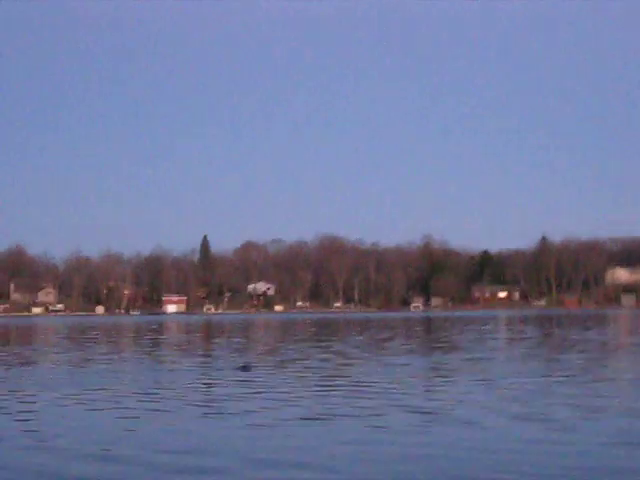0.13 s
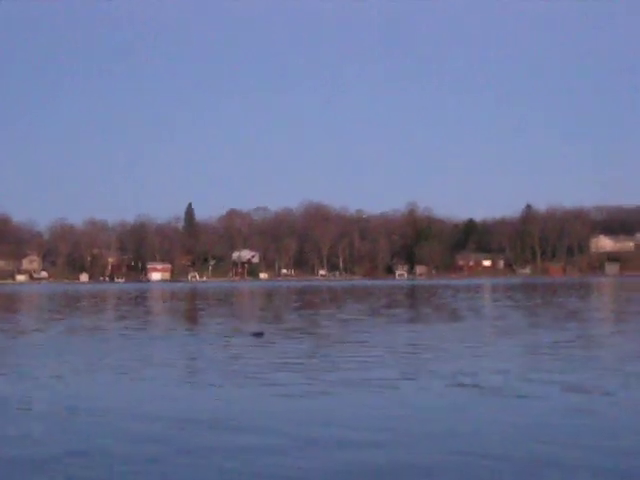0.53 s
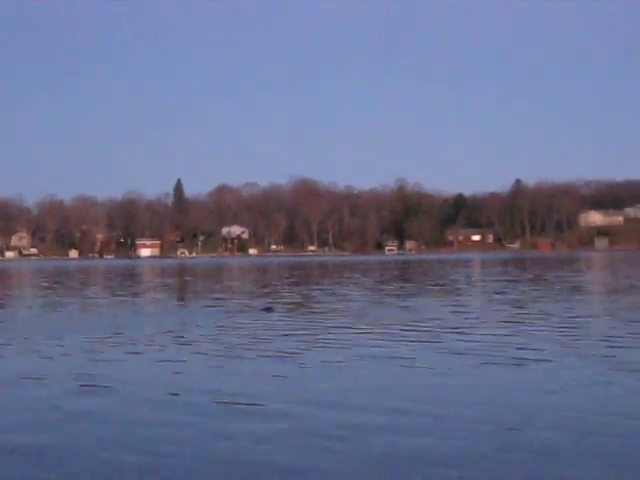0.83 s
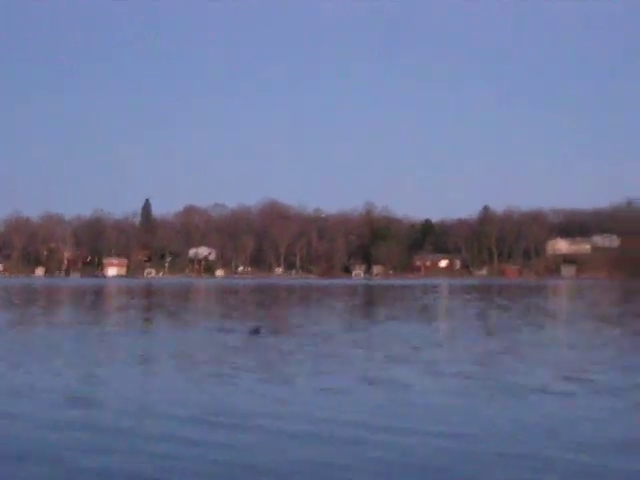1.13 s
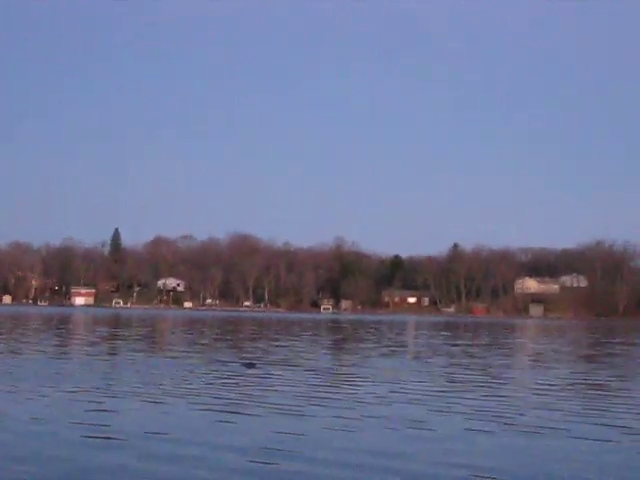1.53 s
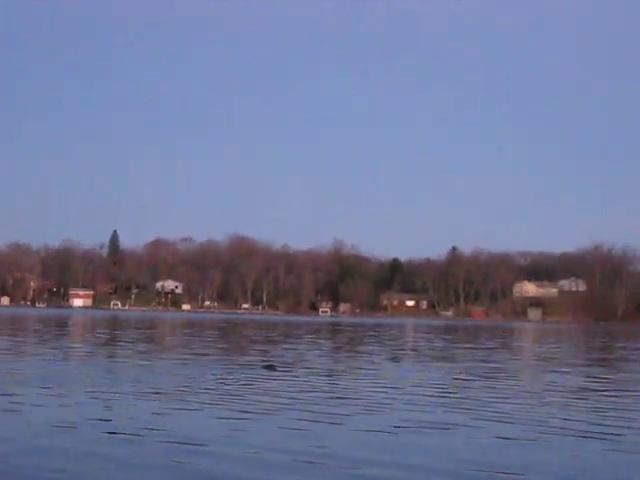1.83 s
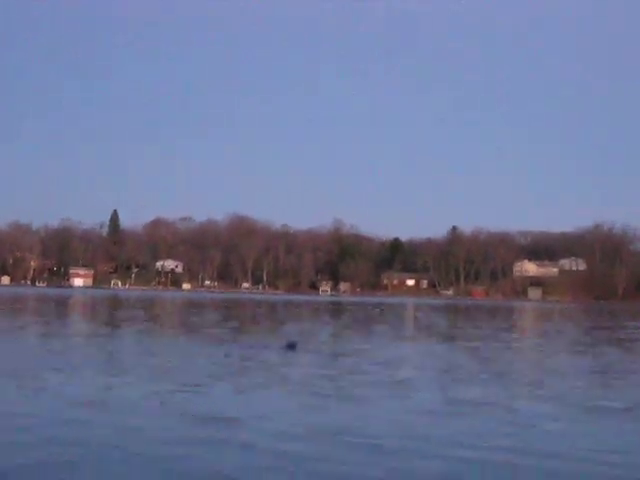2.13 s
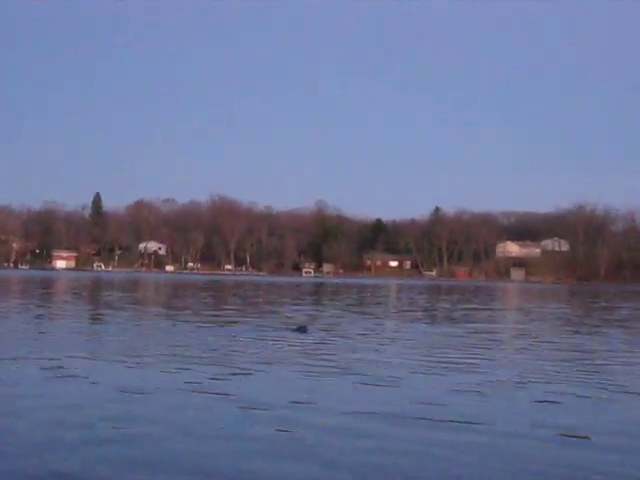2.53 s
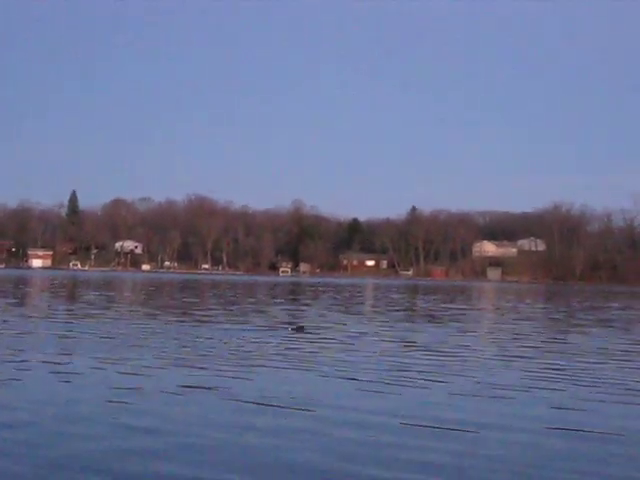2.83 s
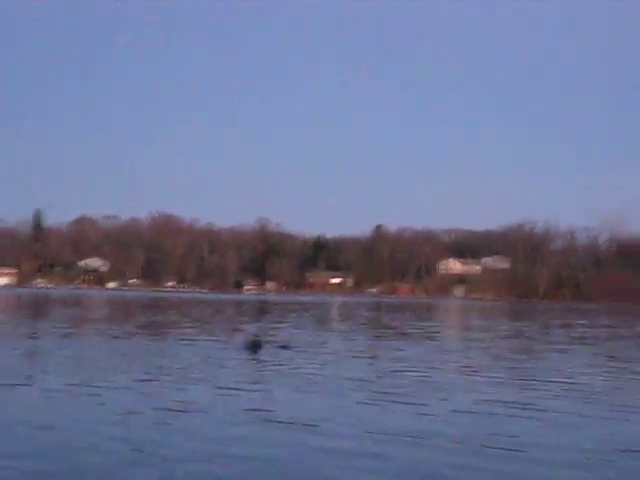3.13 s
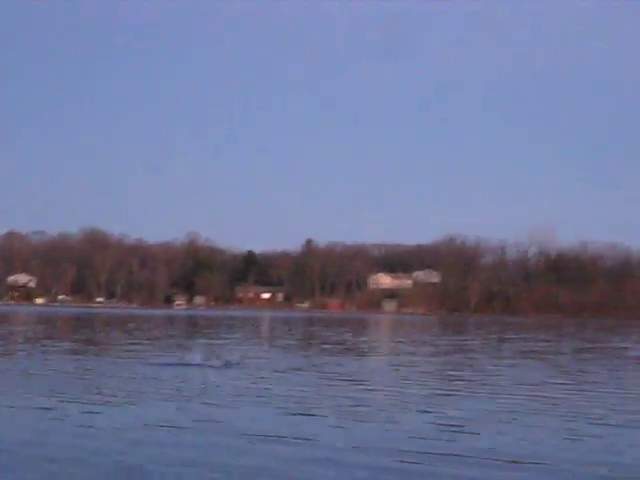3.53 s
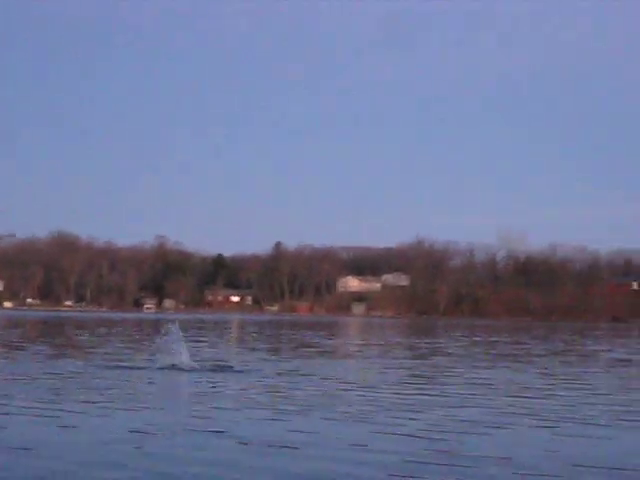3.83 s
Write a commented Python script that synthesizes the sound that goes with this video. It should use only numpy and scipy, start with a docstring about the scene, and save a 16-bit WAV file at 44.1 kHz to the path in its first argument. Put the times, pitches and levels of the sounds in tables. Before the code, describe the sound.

A beaver's tail slaps lake water with a sharp crack after gentle lapping, then spray falls

```python
"""A lake shore at dusk, over a quiet hiss and a faint patter of drops.
Three small clicks, damped modes of a hard body, precede a brief swell of brighter hiss and two lone gurgles.
Then wavelets lap close by: ringing air pockets, noisy splashes, chirping drops and bursting droplets.
A beaver slaps the water with its tail, an impact of short modes and noise; the cavity closes with a thump
and the thrown water rains back as random impacts and bubbles."""
import sys
import numpy as np
from scipy import signal
from scipy.io import wavfile

SR = 44100
rng = np.random.default_rng(int(sys.argv[2]) if len(sys.argv) > 2 else 0)


def master(y):
    """Save y as 16-bit WAV."""
    cut = np.clip(np.atleast_2d(y).T, -1, 1)
    pcm = np.round(cut * 32767)  # scale
    wavfile.write(sys.argv[1], SR, pcm.astype(np.int16))


N = 176400
T = np.arange(N) / SR

# The tail meets the water, edge first, then flat: t/s, level/dB, f/Hz, decay/s
SLAP_MODES = [(3.3308, -16, 5980, 0.0011), (3.3312, -24, 834, 0.0021), (3.3368, -9, 1000, .0012),
              (3.3374, -18.5, 1860, 0.0018), (3.334, -16, 3400, .002), (3.3415, -11, 1960, 0.00065),
              (3.3417, -28, 364, 0.003)]
# The cavity closes: t/s, level/dB, f/Hz, decay/s
CAVITY_MODES = [(3.5638, -18.5, 895, 0.0012), (3.5648, -21.5, 2260, 0.0013), (3.5655, -28, 390, 0.0037),
                (3.5703, -22.5, 603, 0.0024)]
# Spectral density of the torn sheet of water: f/Hz, level/dB (per Hz, relative)
SHEET_SPECTRUM = [(80, -38), (220, -19), (500, -3), (850, -2), (1400, -1), (2000, -6), (2800, -8.5),
                  (3500, 1), (4500, -9.5), (6200, -4.5), (9000, -10.5), (13000, -13.5), (16000, -18)]
SHEET_S, SHEET_DB = 3.3308, -22
SHEET_RISE_S, SHEET_HOLD_S, SHEET_FALL_S = .0025, .0095, .0058


def tail_slap():
    """Impact and cavity collapse: the tail cracks, tears up a sheet of water, and the hole thumps shut."""
    before = np.minimum(T - SHEET_S, 0) / SHEET_RISE_S
    after = np.maximum(T - SHEET_S - SHEET_HOLD_S, 0) / SHEET_FALL_S
    noise = coloured(rng.standard_normal((2, N)), SHEET_SPECTRUM)
    sheet = from_db(SHEET_DB) * np.exp(before - after) * noise
    return sheet + pings(SLAP_MODES, rise=.21) + pings(CAVITY_MODES, rise=.2)


# Thrown water falling back, end values held: t/s, level/dB (before the patter and bubble gains)
SPRAY_LEVEL = [(3.5, -57), (3.58, -40), (3.64, -34.5), (3.71, -41.5), (3.77, -39), (3.84, -42), (3.91, -39),
               (4.0, -41.5)]
# Spectral density of the patter: f/Hz, level/dB (per Hz, relative)
SPRAY_SPECTRUM = [(80, -19), (250, -11), (600, -11), (1200, -1), (2600, -0.5), (4000, -8), (6500, -9),
                  (9000, -17.5), (16000, -18)]
# Loudness of a bubble by its pitch, also for the lapping: f/Hz, level/dB (relative)
BUBBLE_LOUDNESS = [(300, -21), (400, -10.5), (570, -4.5), (1100, 0.5), (1600, 0.5), (3200, 4.5), (4500, -6),
                   (6500, -1)]
BUBBLE_CYCLES = 2.4  # mean decay of a small bubble, in periods


def spray():
    """Shot noise: thousands of random drop impacts patter on the lake, some trapping resonant bubbles."""
    impacts = [grains(6000, spread_db=3.5) for _ in range(2)]
    patter = coloured(impacts, SPRAY_SPECTRUM, patchy_db=3)
    bubbles = swarm(700, BUBBLE_LOUDNESS, BUBBLE_CYCLES, spread_db=4.5, rise=.37, count=4000)
    return level(SPRAY_LEVEL) * (from_db(-1) * patter + from_db(-6) * bubbles)


# Vigour of the lapping: t/s, level/dB (before the bubble and wash gains)
LAPPING_LEVEL = [(1.4, -58), (1.46, -49.5), (1.58, -48), (1.68, -56.5), (1.79, -48.5), (1.93, -54),
                 (2.2, -54), (2.38, -49), (2.68, -45.5), (2.85, -40.5), (3.02, -39.5), (3.27, -41.5),
                 (3.5, -43), (4.0, -48)]
# Spectral density of the wash: f/Hz, level/dB (per Hz, relative)
WASH_SPECTRUM = [(150, -32), (260, -24), (380, -9), (570, -6), (1100, 6.5), (1500, -1), (2400, -3.5),
                 (3300, -3.5), (4500, -13.5), (7000, -16), (15000, -28)]
LAP_START_S, LAP_FADE_S = 1.39, .04  # the first wavelet arrives
BUBBLES_PER_S, BUBBLE_DB, WASH_DB = 1000, -2.5, -8.5


def lapping():
    """Bubble resonance: wavelets trap a swarm of small bubbles over a soft, uneven wash of noise."""
    bubbles = swarm(BUBBLES_PER_S, BUBBLE_LOUDNESS, BUBBLE_CYCLES, spread_db=5.5, rise=.72, count=5000)
    wash = coloured(rng.standard_normal((2, N)), WASH_SPECTRUM, patchy_db=4.5)
    arrival = np.clip((T - LAP_START_S) / LAP_FADE_S, 0, 1)
    return arrival * level(LAPPING_LEVEL) * (from_db(BUBBLE_DB) * bubbles + from_db(WASH_DB) * wash)


# Air pockets that ring: t/s, level/dB (nominal), f/Hz, glide/octaves per length, length/s
AIR_POCKETS = [(.731, -45.5, 530, .05, .017), (.817, -43, 2340, .36, .013),
               (1.456, -35.5, 1700, -.54, .023), (1.474, -30, 1097, -.2, .026),
               (1.521, -39, 653, -.16, .049), (1.560, -33.5, 599, .5, .051), (1.618, -27, 1076, .5, .023),
               (1.629, -32, 1490, 1.15, .023), (1.827, -35.5, 850, .31, .041),
               (1.852, -31.5, 529, .23, .03), (1.944, -39, 908, .1, .02), (1.997, -36.5, 1226, -.72, .027),
               (2.122, -35, 1407, -.1, .018), (2.316, -33, 870, 0, .016), (2.338, -33.5, 894, .03, .018),
               (2.428, -40, 531, .04, .084), (2.568, -29, 866, -.33, .03), (2.598, -31.5, 1150, 0, .018),
               (2.7, -30, 1100, -.09, .027), (2.821, -26.5, 1158, 0, .014), (2.967, -27, 969, .32, .033),
               (3.143, -27.5, 1247, -.45, .052), (3.757, -27, 1182, -.13, .018),
               (3.868, -31, 880, .2, .022), (3.874, -28, 520, .65, .042), (3.876, -40, 265, .1, .045),
               (3.95, -32.5, 1094, .04, .027)]


def gurgles(rough, rise_share):
    """Cavity resonance: each air pocket swells and dies, its pitch gliding as it changes shape."""
    out, t = np.zeros(N), T[:SR // 6]
    noises = rng.standard_normal((len(AIR_POCKETS), 2, len(t)))
    for (s, db, hz, glide, length_s), noise in zip(AIR_POCKETS, noises):
        age = t / (length_s * rise_share)
        envelope = (age * np.exp(1 - age)) ** 2
        pitch = hz * 2 ** (glide * np.minimum(t / length_s, 1.2))
        phase = 2 * np.pi * np.cumsum(pitch) / SR
        # independent noises on sine and cosine roughen amplitude and phase
        a, b = (rms_one(band(n, 27, 170)) for n in noise)
        tone = (1 + rough * a) * np.sin(phase) + rough * b * np.cos(phase)
        add(out, s, from_db(db - 4) * envelope * tone)
    return out


SHED_DB, SHED_OCTAVES = -8, 2.2  # level before the fall with pitch; range above the pocket's pitch
DROP_CYCLES, DROP_GLIDE = 3.8, .06  # decay in periods; octaves per decay time


def shed_bubbles(count):
    """Size and resonance: each air pocket sheds a few smaller, higher and weaker bubbles."""
    out = np.zeros(N)
    all_draws = rng.random((len(AIR_POCKETS), count, 2))
    for (s, db, hz, _, length_s), draws in zip(AIR_POCKETS, all_draws):
        for late, place in draws:
            pitch = hz * 2 ** (SHED_OCTAVES * place)
            gain = from_db(db + SHED_DB) * hz / pitch
            add(out, s + 2 * late * length_s, gain * ping(pitch, DROP_CYCLES / pitch, DROP_GLIDE))
    return out


# Small splashes: t/s, level/dB (nominal), centre f/Hz, decay/s
SPLASH_EVENTS = [(1.46, -35, 2360, .006), (1.773, -31, 2620, .009), (1.924, -32.5, 2170, .002),
                 (2.001, -37.5, 2000, .012), (2.077, -33.5, 3300, .0056), (2.11, -34.5, 3240, .005),
                 (2.3179, -31, 2600, .002), (2.634, -28, 4400, .004), (2.699, -27, 2340, .0098),
                 (2.8443, -20, 1710, .0052), (2.856, -27, 2600, .0099), (3.005, -25, 1810, .012),
                 (3.061, -18, 1410, .002), (3.147, -25.5, 3240, .011), (3.228, -26, 3000, .0076),
                 (3.252, -25, 2020, .008), (3.454, -30.5, 4500, .004), (3.915, -29, 2880, .007)]
SPLASH_BUBBLES_DB, SPLASH_PUFF_DB, SPLASH_OCTAVES = -3.5, -3.5, .494  # gains; spread of pitch


def splashes(count):
    """Wave breaking: a puff of noisy spatter and a quick cluster of bubbles around one pitch."""
    out = np.zeros(N)
    all_draws = rng.standard_normal((len(SPLASH_EVENTS), count, 3))
    for (s, db, hz, decay_s), draws in zip(SPLASH_EVENTS, all_draws):
        for k, (late, place, bend) in enumerate(draws):
            age = 2 * (k + np.tanh(abs(late))) / count
            pitch = hz * 2 ** (SPLASH_OCTAVES * np.clip(place, -2, 2))
            gain = from_db(db + SPLASH_BUBBLES_DB) * np.exp(-age) * np.sign(bend)
            bubble = ping(pitch, BUBBLE_CYCLES / pitch, BUBBLE_GLIDE * bend, rise=.59)
            add(out, s + age * decay_s, gain * bubble)
    puffs = bursts(SPLASH_EVENTS, width=.54, attack_s=.00034)
    return out + from_db(SPLASH_PUFF_DB) * band(puffs, 300, 6200)


# Single drops falling close by: t/s, level/dB (before the mix gain), f/Hz
DROP_EVENTS = [(1.434, -34, 2500), (1.512, -34, 1750), (1.583, -32.5, 2550), (1.686, -38, 2000),
               (1.763, -30, 1900), (1.787, -34, 1800), (1.839, -37, 2550), (2.115, -30, 1450),
               (2.359, -32, 3000), (2.4452, -27, 3400), (2.529, -31.5, 1950), (2.7306, -27, 1920),
               (2.7842, -28, 2070), (2.7947, -23, 2900), (2.809, -27, 2420), (2.8581, -23, 2800),
               (2.8899, -28, 1690), (2.9552, -26, 1920), (3.0618, -14, 3330), (3.1496, -22, 3230),
               (3.1587, -22, 3270), (3.2292, -23, 1440), (3.2803, -25, 2150), (3.379, -27, 1870),
               (3.393, -25.5, 2100)]
DROP_TICK_DB, DROP_TICK_S = -7, .0004  # tick of contact: relative level, decay


def drops():
    """Impact and entrainment: a drop ticks on contact and traps a bubble that chirps upward."""
    out = np.zeros(N)
    draws = rng.uniform(.5, 1.5, (len(DROP_EVENTS), 2))
    for (s, db, hz), (life, bend) in zip(DROP_EVENTS, draws):
        add(out, s, from_db(db) * ping(hz, life * DROP_CYCLES / hz, bend * DROP_GLIDE, rise=.07))
    contacts = [(s, db + DROP_TICK_DB, 2 * hz, DROP_TICK_S) for s, db, hz in DROP_EVENTS]
    return out + bursts(contacts, width=1, attack_s=DROP_TICK_S / 10)


# Level of the fine droplet crackle, before its flurries: t/s, level/dB
CRACKLE_LEVEL = [(1.35, -80), (1.46, -58), (1.56, -57), (1.62, -63), (1.76, -60), (1.95, -65),
                 (2.07, -51.5), (2.17, -63), (2.4, -52.5), (2.6, -57), (2.95, -50), (3.25, -49), (3.5, -56),
                 (4.0, -70)]
# Loudness of a fine droplet by its pitch: f/Hz, level/dB (relative)
CRACKLE_LOUDNESS = [(4500, 0), (15500, 0)]
# Droplets bursting close by: t/s, level/dB, f/Hz
NEAR_TICKS = [(1.6555, -17.5, 11600), (2.17, -33, 12700), (2.233, -31, 4860), (2.258, -31.5, 5500),
              (2.2855, -23, 13000), (2.3187, -28, 4770), (2.3403, -25, 12400), (2.3893, -27, 5320),
              (2.3947, -23, 12000), (2.4453, -19.5, 11000), (2.513, -30, 10400), (2.6113, -29, 14000),
              (2.6525, -14, 6070), (2.6524, -15.5, 12700), (2.6803, -29, 5750), (2.8731, -20.5, 13000),
              (2.9134, -28, 14000), (2.9556, -25, 12400), (2.9846, -26, 10200), (3.0964, -22.5, 5600),
              (3.1611, -23, 12200), (3.2192, -22, 6500), (3.23, -20.5, 6040), (3.4306, -22.5, 9200),
              (3.478, -26, 12000)]
CRACKLES_PER_S, CRACKLE_CYCLES, FIZZ_DB = 540, 4.2, -1.5
TICK_CYCLES = 2.07  # decay of a near tick, in periods


def crackle():
    """Film rupture: tiny droplets and films burst in flurries of bright ticks, a few of them very near."""
    fine = swarm(CRACKLES_PER_S, CRACKLE_LOUDNESS, CRACKLE_CYCLES, spread_db=9.5, rise=.12, count=3000)
    snaps = from_db(FIZZ_DB) * rms_one(band(grains(540, spread_db=5.5), 7300, 19000, order=1))
    flurry = rms_one(from_db(5 * np.tanh(drift(22))))
    # treble part of the splashes
    spatter = from_db(-6) * bursts(SPLASH_EVENTS, width=.69, attack_s=.0004)
    near = pings([(s, db, hz, TICK_CYCLES / hz) for s, db, hz in NEAR_TICKS], rise=.048)
    return level(CRACKLE_LEVEL) * flurry * (fine + snaps) + band(spatter, 8000, 17000) + near


# Dry clicks: t/s, level/dB (added to the mode's), narrowing/dB per octave
CLICK_EVENTS = [(.1032, -25.5, 0), (.1838, -29.5, 6), (0.2778, -25, 12.5)]
# What the clicks ring with: f/Hz, level/dB (relative), decay/s
BODY_MODES = [(390, -10.5, .001), (1260, 1, 0.00085), (2230, -7.5, 0.0017), (3600, 1.5, 0.00061),
              (6500, -4, 0.00041), (10800, -8, .0004)]
CLICK_HZ = 4080  # narrowed clicks keep most of their strength near this pitch
CLICK_SCUFF_DB, CLICK_SCUFF_S = -32.5, .0015


def clicks():
    """Modal excitation: a tiny scuff sets the same hard body ringing, at some clicks more thinly."""
    rows = []
    for s, db, narrowing in CLICK_EVENTS:
        for hz, mode_db, decay_s in BODY_MODES:
            loss_db = narrowing * abs(np.log2(hz / CLICK_HZ))
            rows.append((s, db + mode_db - loss_db, hz, decay_s))
    scuffs = [(s, CLICK_SCUFF_DB, CLICK_HZ, CLICK_SCUFF_S) for s, _, _ in CLICK_EVENTS]
    return pings(rows, rise=.24) + bursts(scuffs, width=.53, attack_s=.00071)


ECHO_S, ECHO_DB = .004105, -17.5  # dull reflection from a nearby surface
SHORE_DB, SHORE_T60_S, SHORE_HZ = -15.5, .083, 1750  # dull scatter from the bank


def shore(x):
    """Reflection and scattering: one near, inverted echo and a short dull reverberation."""
    t = T[:SR // 3]
    scatter = band(rng.standard_normal(len(t)), 310, SHORE_HZ) * from_db(-60 * t / SHORE_T60_S)
    scatter *= np.sqrt(2 * SHORE_HZ / SR / np.sum(scatter ** 2))
    echo = np.interp(T - ECHO_S, T, band(x, 150, 1960, order=1), left=0)
    return x - from_db(ECHO_DB) * echo + from_db(SHORE_DB) * signal.fftconvolve(x, scatter)[:N]


SWELL_DB, SWELL_S, SWELL_WIDTH_S = -56.5, .34, .15


def hiss_swell():
    """Amplitude modulation: a brighter band of noise swells briefly under a Gaussian envelope."""
    envelope = np.exp(-((T - SWELL_S) / SWELL_WIDTH_S) ** 2)
    return from_db(SWELL_DB) * envelope * rms_one(band(rng.standard_normal(N), 1500, 13000, order=1))


# Spectral density of the background hiss: f/Hz, level/dB (per Hz, relative)
AIR_SPECTRUM = [(25, 0), (60, -2), (270, -3.5), (400, -7), (550, -4), (900, -6.5), (1500, -11),
                (2700, -13.5), (6500, -19), (9200, -17), (16000, -22)]
AIR_DB = -59


def background_hiss():
    """Stationary noise: a steady hiss shaped by its spectral density."""
    return from_db(AIR_DB) * coloured(rng.standard_normal((2, N)), AIR_SPECTRUM)


BUBBLE_GLIDE = .062  # spread of the pitch bend, octaves per decay time


def swarm(per_s, colour, cycles, spread_db, rise, count):
    """Bubble population: random births, even in octaves; small ones die sooner; rms 1."""
    out, (low, high) = np.zeros(N), (colour[0][0], colour[-1][0])
    uniform, normal = rng.random((count, 3)), rng.standard_normal((count, 3))
    for (when, chance, place), (size, bend, life) in zip(uniform, normal):
        if chance < per_s * N / SR / count:
            hz = low * (high / low) ** place
            gain = from_db(at_hz(colour, hz) + spread_db * min(size, 2)) * np.sign(bend)
            decay_s = cycles * 2 ** (life / 2) / hz
            add(out, when * T[-1], gain * ping(hz, decay_s, BUBBLE_GLIDE * bend, rise))
    return rms_one(out)


def ping(hz, decay_s, glide=0, rise=.1):
    """Damped oscillation under a peak of 1; rise and glide (octaves) are relative to the decay time."""
    age = np.arange(int(6 * decay_s * SR) + 8) / (decay_s * SR)
    envelope = (1 - np.exp(-age / rise)) ** 2 * np.exp(-age)
    phase = 2 * np.pi * np.cumsum(hz * 2 ** (glide * np.minimum(age, 4))) / SR
    return envelope / envelope.max() * np.sin(phase)


def pings(rows, rise):
    """Superposition of damped modes from rows of t/s, level/dB, f/Hz, decay/s."""
    out = np.zeros(N)
    for s, db, hz, decay_s in rows:
        add(out, s, from_db(db) * ping(hz, decay_s, rise=rise))
    return out


def bursts(rows, width, attack_s):
    """Impact noise: a dying puff in a broad resonance, width in octaves each way."""
    out, t = np.zeros(N), T[:SR // 10]
    for (s, db, hz, decay_s), noise in zip(rows, rng.standard_normal((len(rows), len(t)))):
        envelope = (1 - np.exp(-t / attack_s)) * np.exp(-t / decay_s)
        puff = band(noise * envelope, hz / 2 ** width, hz * 2 ** width, order=1)
        # set the energy by the envelope, whatever the noise drawn
        energy_gain = np.sqrt(np.sum((envelope / envelope.max()) ** 2) / np.sum(puff ** 2))
        add(out, s, from_db(db) * .5 * puff * energy_gain)
    return out


def coloured(sources, spectrum, patchy_db=None):
    """Subtractive synthesis: half-octave bands from two sources in turn, steady or flickering; rms 1."""
    edges, out = 22 * 2 ** np.arange(0, 10, .5), 0
    for k, (lo, hi) in enumerate(zip(edges, edges[1:])):
        if hi > spectrum[0][0]:
            part = band(sources[k % 2], lo, hi) * from_db(at_hz(spectrum, np.sqrt(lo * hi)))
            if patchy_db is not None:
                part = part * from_db(patchy_db * drift(22))
            out = out + part
    return rms_one(out)


def grains(per_s, spread_db):
    """Poisson impulses: random clicks of very uneven size."""
    sizes = from_db(spread_db * np.minimum(rng.exponential(1, N), 4)) * rng.choice([-1, 1], N)
    return sizes * (rng.random(N) < per_s / SR)


def drift(rate):
    """Low-passed noise: slow random motion of spread 1, computed at every 20th sample."""
    r = np.exp(-40 * np.pi * rate / SR)
    noise = rng.standard_normal(N // 20 + 2002)
    slow = signal.lfilter([1], [1, -2 * r, r * r], noise)[2000:]
    return np.interp(np.arange(N) / 20, np.arange(len(slow)), rms_one(slow))


def band(x, low_hz, high_hz, order=2):
    """Butterworth band-pass filtering."""
    edges = [low_hz, min(high_hz, .47 * SR)]
    return signal.sosfilt(signal.butter(order, edges, "band", fs=SR, output="sos"), x + 1e-18)


def from_db(db):
    """Logarithmic level: decibels to amplitude gain."""
    return 10 ** (np.asarray(db) / 20)


def rms_one(x):
    """Normalisation to unit power."""
    return x / np.sqrt(np.mean(x ** 2) + 1e-20)


def level(rows):
    """Envelope: gain over time from points of t/s, level/dB."""
    return from_db(np.interp(T, *np.transpose(rows)))


def at_hz(points, hz):
    """Spectrum read by interpolation on a log-frequency axis."""
    f, db = np.transpose(points)
    return np.interp(np.log(hz), np.log(f), db)


def add(out, s, x):
    """Superposition: mix a short sound in at time s."""
    i = int(s * SR)
    out[i:i + len(x)] += x[:max(N - i, 0)]


def scene():
    """Superposition: water with its shore reflections, then dry clicks and hiss."""
    water = tail_slap() + spray() + lapping()
    water += gurgles(rough=.33, rise_share=.26) + shed_bubbles(count=4)
    water += splashes(count=6) + from_db(-2.5) * drops() + crackle()
    return (shore(water) + clicks() + hiss_swell() + background_hiss())[None]


NOTCH_HZ, NOTCH_Q = 7877, 4.7  # dead spot of the microphone
CUTOFF_HZ = 15900


def record(dry):
    """Linear filtering: the microphone has a narrow hole in the treble; the top is cut."""
    x = signal.lfilter(*signal.iirnotch(NOTCH_HZ, NOTCH_Q, fs=SR), dry)
    return signal.sosfilt(signal.ellip(10, .3, 80, CUTOFF_HZ, fs=SR, output="sos"), x)


dry = scene()
out = record(dry)
master(out)
```